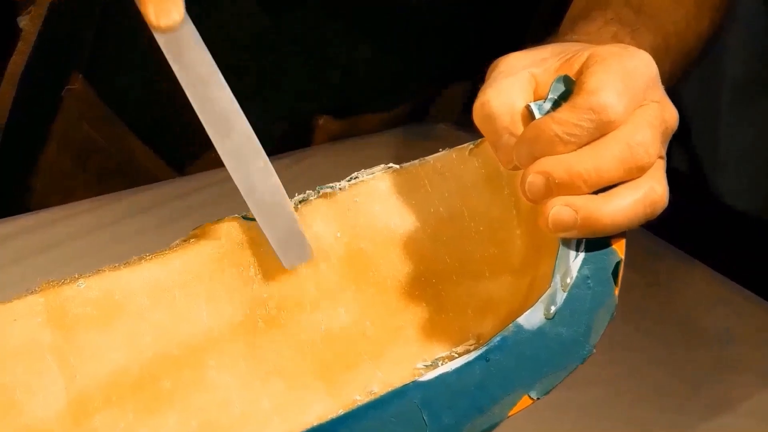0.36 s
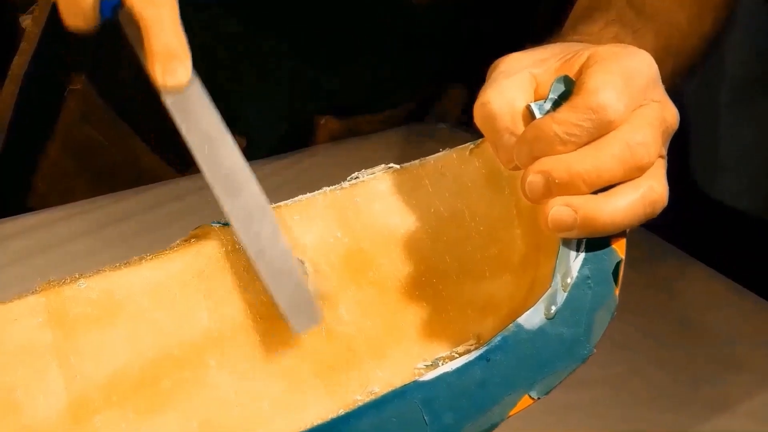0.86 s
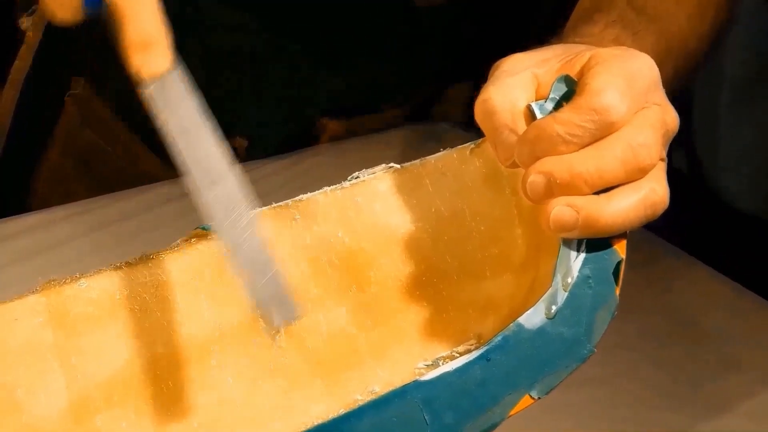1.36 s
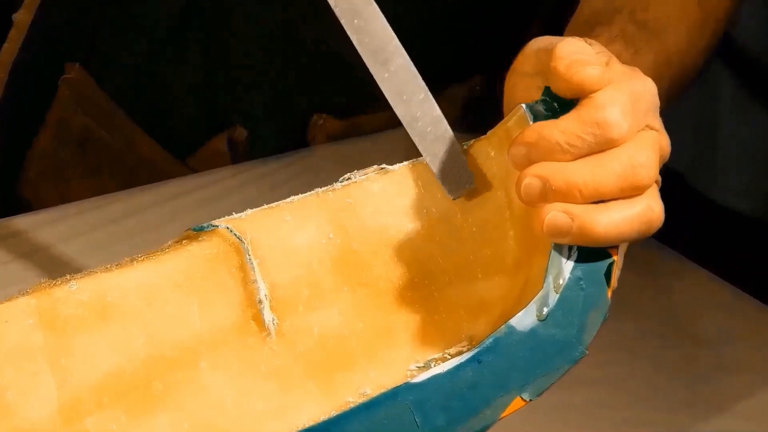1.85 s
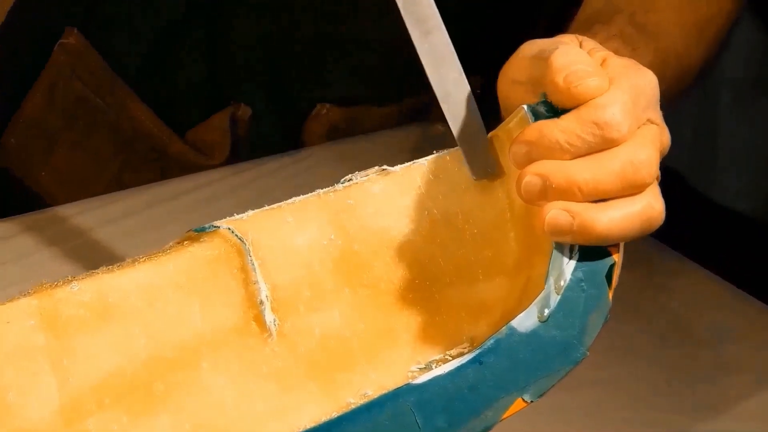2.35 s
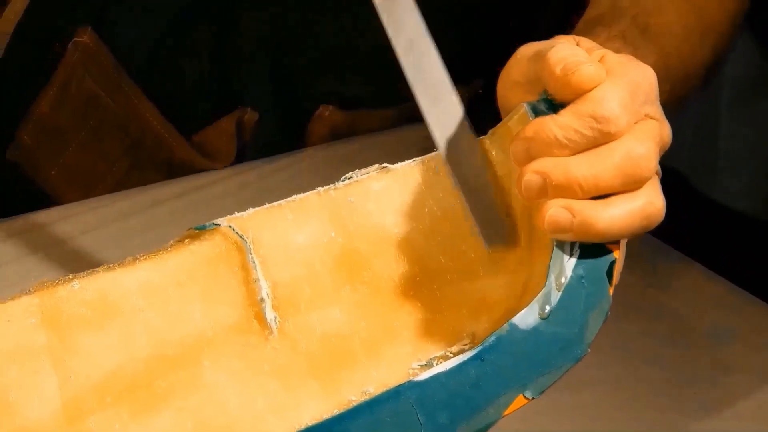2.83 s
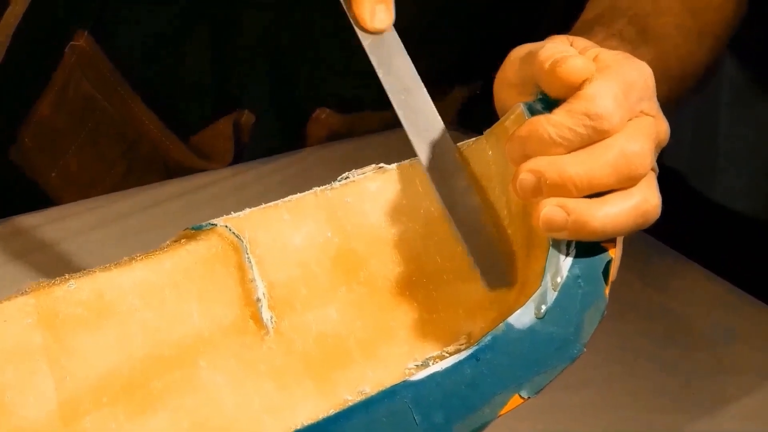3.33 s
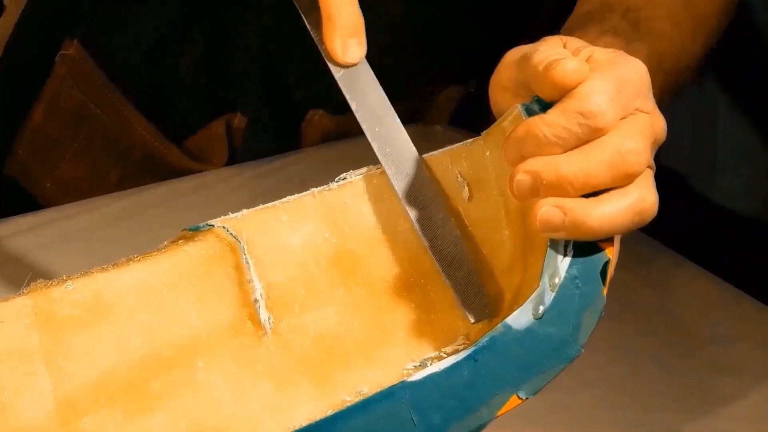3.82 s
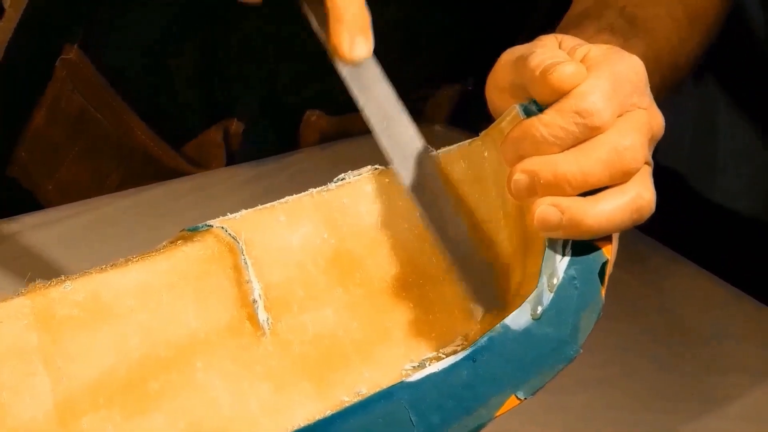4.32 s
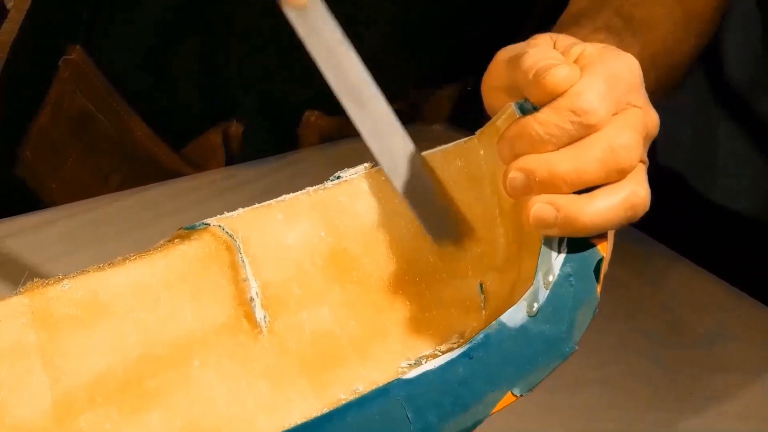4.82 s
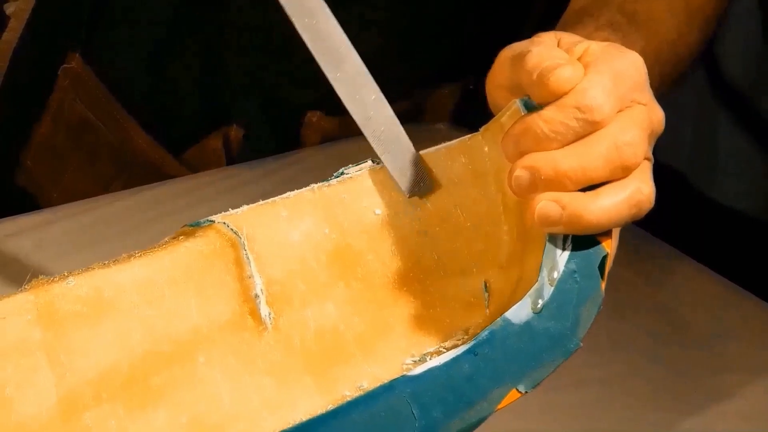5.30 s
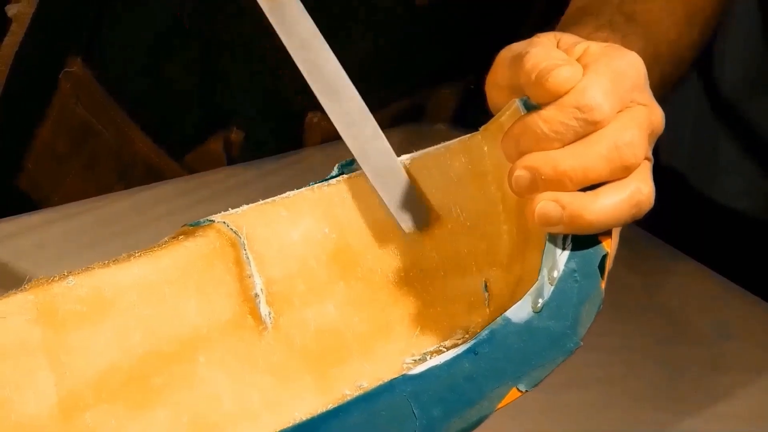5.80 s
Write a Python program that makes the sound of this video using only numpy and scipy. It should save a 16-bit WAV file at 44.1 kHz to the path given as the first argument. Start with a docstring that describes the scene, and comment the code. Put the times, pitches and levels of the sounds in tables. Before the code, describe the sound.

Close and centred in a small workshop, a steel file saws a hollow fiberglass rim. Strong pushes chatter and honk through the shell with gritty rasp and bright fibre hiss; lighter, duller strokes draw back. After three pushes it stops, with only faint taps and ticks over quiet room tone, then short scrapes lead into regular back-and-forth filing until the end.

```python
"""A flat steel file is pushed and drawn along the rim of a hollow fiberglass shell in a small workshop.
Close and centred, the teeth chatter on the rim and drive the shell's resonances; filtered random grains make
the rasp of grit in the steel and the bright hiss of tearing fibres. Clicks knock the shell and start snaps.
In a pause the file is lifted, set down on another spot and nudged into place.
Bench scatter and a room tail spread to both sides of the stereo pair, over a quiet room tone."""
import sys
import numpy as np
from scipy import signal
from scipy.fft import rfft, irfft, next_fast_len
from scipy.io import wavfile
from scipy.ndimage import uniform_filter1d

SR = 44100
rng = np.random.default_rng(int(sys.argv[2]) if len(sys.argv) > 2 else 0)


def ratio(d):
    """dB to gain"""
    e = np.asarray(d, float) / 20
    return 10 ** e


def output_pcm(signal):
    """Save a mono or channel-first signal as 16-bit PCM at the path in sys.argv[1].

    Samples are clipped to [-1, 1] before scaling.
    """
    pcm = np.clip(np.atleast_2d(signal).T, -1, 1) * 32767
    wavfile.write(sys.argv[1], SR, np.round(pcm).astype(np.int16))


N = 271985   # length in samples


def rms_one(x):
    """Scale to unit rms."""
    return x / np.sqrt(np.mean(x ** 2) + 1e-20)


def evened(x, seconds):
    """Divide out the running level."""
    return x / np.sqrt(uniform_filter1d(x ** 2, max(int(seconds * SR), 9)) + 1e-12)


def drift(rate_hz):
    """Slow chance of spread 1: noise twice through a one-pole."""
    r = np.exp(-2 * np.pi * rate_hz / SR)
    noise = rng.standard_normal(N + SR)
    return rms_one(signal.lfilter([1], [1, -2 * r, r * r], noise)[SR:])   # the first second settles the filter


def coloured(x, spectrum):
    """Weight x by a spectrum in dB, interpolated over log frequency."""
    hz, level_db = np.transpose(spectrum)
    size = next_fast_len(N)
    grid_hz = np.maximum(np.arange(size // 2 + 1) * SR / size, 1)
    gain = ratio(np.interp(np.log(grid_hz), np.log(hz), level_db))
    return irfft(rfft(x, size) * gain, size)[..., :N]


SING_DB, SING_OCTAVES = 4.5, .18      # modes this close to the chatter rate are driven harder


def resonate(force, modes, wander_db, wander_rate, chatter_hz=None):
    """Parallel resonances; each one's coupling wanders as the contact slides, and grows near the chatter rate."""
    out = np.zeros(N)
    for k, (hz, width_hz, level_db) in enumerate(modes):
        r = np.exp(-np.pi * width_hz / SR)
        near_db = 0
        if chatter_hz is not None:
            near_db = SING_DB * np.exp(-(np.log2(hz / chatter_hz) / SING_OCTAVES) ** 2)
        coupling_db = level_db + near_db + wander_db * np.clip(drift(wander_rate), -2, 1)
        drive = force * ratio(coupling_db) * (-1) ** k / np.sqrt(width_hz)
        poles = [1, -2 * r * np.cos(2 * np.pi * hz / SR), r * r]
        out += signal.lfilter([1 - r * r, 0, r * r - 1], poles, drive)
    return out


def grains(per_s, spread_db):
    """Random clicks of uneven size and sign."""
    sizes = ratio(spread_db * np.minimum(rng.exponential(1, N), 5)) * rng.choice([-1, 1], N)
    return rms_one(sizes * (rng.random(N) < per_s / SR))


def clicks(events):
    """A train of clicks at the events' moments."""
    train = np.full(N, 1e-18)
    for s, level_db in events:
        train[int(s * SR)] = ratio(level_db)
    return train


LANDING_DB = -30                          # level one bite time ahead of the stroke; twice as low two ahead
KNEE_SHARE, KNEE_LEFT = 0.406, 0.2487     # this far to the crest, this share of the swell is left


def stroke_db(t, strokes, shape):
    """One row a stroke: the file lands and bites, swells fast then slowly, glides to the end level, lets go."""
    bite_s, bite_db, delay, end_db, release = shape
    levels = [2 * LANDING_DB, LANDING_DB, bite_db, KNEE_LEFT * bite_db, 0, end_db, end_db - 2 * release]
    rows = []
    for s, length, crest, *_ in strokes:
        top = np.clip(crest + delay, .03, .97) * length
        times = [-2 * bite_s, -bite_s, 0, KNEE_SHARE * top, top, length, length + 2]
        rows.append(np.interp(t - s, times, levels, left=-200))
    return np.array(rows)


def swell_db(t, events, slopes):
    """One row an event: straight rise in dB, hold, straight fall."""
    s, level_db, hold = np.array(events).T[:3, :, None]
    rise, fall = slopes[0] * (t - s), slopes[1] * (s + hold - t)
    return level_db + np.minimum(0, np.minimum(rise, fall))


LET_GO_S = .06


def glide(t, strokes, span_hz):
    """Chatter rate along each stroke and just after it."""
    return np.array([np.interp(t - s, [0, length, length + LET_GO_S], span_hz) for s, length, *_ in strokes])


def summed(*rows_db):
    """Levels add as powers."""
    return 10 * np.log10(np.sum(ratio(np.vstack(rows_db)) ** 2, axis=0) + 1e-14)


# cutting strokes, pushed away:
# start t/s, length t/s, crest [share of length], shell level/dB, rasp level/dB, fibre hiss level/dB
PUSHES = [(0.055, .18, 0.4604, -19, -25.5, -32.5), (0.620, .19, 0.453, -18.5, -27, -32),
          (1.172, .12, 0.701, -21, -31, -32), (2.466, 0.04045, 0.9, -26, -35.5, -31),
          (2.585, 0.0925, 0.43, -22, -33, -39), (2.688, 0.14, 0.787, -21, -28, -29.5),
          (3.215, .18, 0.454, -21, -27, -32.5), (3.758, 0.19, 0.26, -19, -25.5, -29),
          (4.298, .21, 0.34, -20.5, -28, -30.5), (4.897, .235, 0.2983, -20.5, -26, -29.5),
          (5.488, 0.17, 0.18, -22.5, -28.5, -29), (6.129, 0.13, .15, -22.5, -21, -27)]
# light strokes, drawn back:
# start t/s, length t/s, crest [share of length], shell level/dB, rasp level/dB, fibre hiss level/dB
DRAWS = [(-0.12, 0.12, .3, -27, -30.5, -43), (0.408, 0.16, 0.058, -28, -36, -51),
         (1.011, 0.11, 0.21, -24, -37, -51.5), (2.925, .2, 0.38, -23.5, -38.5, -47),
         (3.495, 0.17, 0.1, -23, -37.5, -47), (4.026, .19, 0.15, -27, -36, -48),
         (4.588, .23, 0.3, -23, -31, -43), (5.233, 0.18, 0.31, -28.5, -33.5, -43.5),
         (5.835, .14, .7, -27, -31.5, -47)]
# the teeth grab and one mode of the shell sings out: t/s, level/dB, hold t/s, chatter f/Hz
GRABS = [(0.121, -11, 0.01484, 826.4), (.185, -16, 0.0456, 390), (0.419, -17, 0.01999, 813.8),
         (0.526, -20, 0.01504, 805), (0.546, -25, .035, 387.7), (0.657, -20, 0.01957, 867.4),
         (.720, -17.5, 0.0302, 476), (0.747, -14.5, .02, 823), (1.02, -19.5, .03, 827),
         (1.074, -23, 0.04986, 392.4), (1.222, -18.5, 0.0248, 842), (1.269, -13.5, .02, 538),
         (1.299, -19.5, 0.01493, 537), (2.709, -22, .015, 771), (2.773, -18.5, .05, 890.5),
         (2.943, -23, 0.0303, 373), (3.029, -21, 0.03956, 547.8), (3.319, -13.5, 0.0297, 788),
         (3.355, -17.5, .03, 1001), (3.500, -23, 0.017, 549), (3.554, -18, 0.0199, 380),
         (3.604, -20, 0.0304, 561.3), (3.669, -27, 0.02986, 350.3), (3.798, -16, 0.046, 842.5),
         (3.857, -16, 0.04076, 441.5), (4.031, -24, 0.03006, 338), (4.140, -27, .03, 980.3),
         (4.368, -16, .04, 897), (4.454, -18, .05, 560), (4.592, -25, 0.0199, 320), (4.665, -21, .02, 689),
         (4.701, -22, 0.0603, 425), (4.791, -24.5, .03, 390.2), (4.943, -14, .015, 910),
         (4.976, -15, .025, 958), (5.048, -19, 0.0306, 366), (5.345, -19, .04, 387.7),
         (5.506, -21, 0.01965, 544), (5.561, -16.5, .015, 439), (5.602, -22.5, .02, 430),
         (5.670, -25, 0.027, 324), (5.900, -22, .03, 750), (5.937, -20, 0.011, 358), (6.161, -18, .03, 797)]
# the whole shell lurches on the bench: t/s, level/dB, hold t/s
LURCHES = [(0.203, -26, 0.018), (0.241, -22.5, .04), (0.537, -33, 0.051), (.816, -23, .02),
           (1.064, -38, 0.021), (1.182, -26.5, 0.019), (1.288, -35, 0.037), (2.506, -32.5, 0.019),
           (2.625, -21.5, .06), (2.812, -28, 0.021), (2.932, -27, .02), (3.235, -31, 0.021),
           (3.385, -24, 0.046), (3.505, -30, .02), (3.768, -30, 0.016), (3.919, -19, 0.06),
           (4.052, -25.5, 0.047), (4.309, -32, .03), (4.488, -19, .025), (4.590, -28, .02),
           (5.027, -24, .05), (5.103, -21, 0.044), (5.509, -25, .02), (5.661, -22.5, 0.034),
           (6.131, -27.5, 0.018)]
# a bundle of fibres rips: t/s, level/dB, hold t/s
RIPS = [(.120, -29.5, 0.011), (2.488, -25.5, 0.0096), (2.61, -31, 0.011), (2.696, -27.5, 0.011),
        (2.773, -25.5, 0.023), (2.967, -33, 0.0095), (3.815, -23, 0.025), (4.376, -28.5, 0.0095),
        (5.078, -31, 0.0093), (5.268, -37, .01), (5.533, -22, 0.021), (5.825, -35.5, .01),
        (5.950, -35, .01)]
# the file is lifted, set down and nudged: t/s, shell level/dB, deep boom level/dB, fibre hiss level/dB
NUDGE = [(1.3, -37.5, -29, -79), (1.559, -70, -77, -84.5), (1.66, -67, -48, -69), (1.74, -80, -74, -89),
         (1.974, -85, -79, -88), (2.0, -52, -36.5, -78), (2.069, -62.5, -48, -90), (2.27, -54.5, -44, -55),
         (2.34, -52, -40.5, -58), (2.43, -58.5, -61, -71), (2.5, -95, -90, -84.5)]
NUDGE_CHATTER_HZ, NUDGE_RASP_DB = 380, -25      # rasp against the shell
# how a stroke shapes each layer:
# bite t/s, level/dB at the bite, delay of the crest [share of length], level/dB at the end, release [dB/s]
PUSH_SHELL, PUSH_BOOM = (0.29, -16.5, 0.4, -6, 260), (.03, 2.5, -1.8, 1.5, 168.5)
PUSH_RASP, PUSH_HISS = (0.01, -18.5, -0.36, -2, 324), (0.03, -19, -0.03, -3.5, 481.5)
DRAW_SHELL, DRAW_BOOM = (0.014, -6.5, 0.9, -3, 260.5), (0.2, -4, -2.2, -1, 199)
DRAW_RASP, DRAW_HISS = (0.08, -8.5, 0.16, -9, 249), (0.08, -0.5, 0.5, -10, 200.5)
PUSH_BOOM_DB, DRAW_BOOM_DB = -37.5, -33.5
# swell and fade: rise [dB/s], fall [dB/s]
GRAB_SLOPES, LURCH_SLOPES, RIP_SLOPES = (800, 800), (500, 320), (900, 500)
# the chatter slows along a stroke: f/Hz at the start, f/Hz at the end, f/Hz once let go
PUSH_CHATTER, DRAW_CHATTER = (820, 480, 340), (640, 430, 340)
THIN_DB_PER_OCTAVE, THIN_FULL_HZ = 7.5, 931     # faster chatter favours the thin upper modes
DULL_DB, DULL_PER_HISS_DB = -3, -0.18           # the more fibres tear against the grit, the brighter the rasp
STEP_S = .002                                   # time step of the levels


def controls():
    """Levels and chatter rate from strokes, grabs, lurches, rips and nudges."""
    t = np.arange(0, N / SR + STEP_S, STEP_S)
    push, draw = np.array(PUSHES), np.array(DRAWS)
    s, *columns = np.transpose(NUDGE)
    nudge, nudge_boom, nudge_hiss = [np.interp(t, s, c, left=-200) for c in columns]
    shells = np.vstack([push[:, 3:4] + stroke_db(t, push, PUSH_SHELL),
                        draw[:, 3:4] + stroke_db(t, draw, DRAW_SHELL),
                        swell_db(t, GRABS, GRAB_SLOPES), nudge])
    rates = np.vstack([glide(t, push, PUSH_CHATTER), glide(t, draw, DRAW_CHATTER),
                       np.array(GRABS)[:, 3:] + 0 * t, NUDGE_CHATTER_HZ + 0 * t])
    # the loudest contact sets the chatter rate
    chatter = np.average(rates, axis=0, weights=ratio(shells) ** 2 + 1e-18)
    boom = summed(PUSH_BOOM_DB + stroke_db(t, push, PUSH_BOOM), DRAW_BOOM_DB + stroke_db(t, draw, DRAW_BOOM),
                  swell_db(t, LURCHES, LURCH_SLOPES), nudge_boom)
    grit = summed(push[:, 4:5] + stroke_db(t, push, PUSH_RASP), draw[:, 4:5] + stroke_db(t, draw, DRAW_RASP),
                  nudge + NUDGE_RASP_DB)
    hiss = summed(push[:, 5:] + stroke_db(t, push, PUSH_HISS), draw[:, 5:] + stroke_db(t, draw, DRAW_HISS),
                  swell_db(t, RIPS, RIP_SLOPES), nudge_hiss)
    thin = THIN_DB_PER_OCTAVE * np.log2(chatter / THIN_FULL_HZ)
    dull = DULL_DB + DULL_PER_HISS_DB * (hiss - grit)
    curves = (summed(shells), chatter, boom, thin, grit, dull, hiss)
    return [np.interp(np.arange(N) / SR, t, c) for c in curves]


# shell modes, the first nine full, the rest thin (knocks ring them too): f/Hz, width f/Hz, relative level/dB
SHELL_MODES = [(270, 43, -3.5), (313, 30, -2), (354, 14, 0), (385.4, 11, 3), (446.2, 14, -4.5),
               (475, 19, -8.5), (549, 30, 2.5), (614.7, 64, -3.5), (658, 6.2, -8.5), (696, 14, -6),
               (744.6, 21, -2.5), (814.6, 42, 3), (882.5, 59, -0.5), (964, 11, 1), (981.4, 20, -7.5),
               (1075.6, 22, -6), (1192, 70, -18.5), (1430, 23, -20), (1486.5, 12, -13)]
# deep modes of the whole shell on the bench: f/Hz, width f/Hz, relative level/dB
BOOM_MODES = [(45.9, 330, -21.5), (116.7, 21, -8.5), (158.6, 17, -2.5), (211.8, 34, -1)]


def shell(level_db, chatter_hz, boom_db, thin_db):
    """Teeth catch and slip unevenly at the chatter rate; nearby modes sing out of the grind.
    Near the free rim the thin upper modes take a larger share."""
    phase = 2 * np.pi * np.cumsum(chatter_hz * (1 + 0.0502 * drift(39.4))) / SR
    chatter = rms_one(np.sin(phase) * ratio(9.8 * drift(44)))
    force = grains(2500, 3.45) + 0.08 * chatter
    # the resin edge is a soft contact
    force = signal.sosfilt(signal.butter(2, 1300, fs=SR, output="sos"), force)
    full, thin = [evened(resonate(force, modes, wander_db=4.0, wander_rate=9.0, chatter_hz=chatter_hz), 0.045)
                  for modes in (SHELL_MODES[:9], SHELL_MODES[9:])]
    deep = evened(resonate(force, BOOM_MODES, wander_db=3.0, wander_rate=7.1), 0.17)
    share = np.clip(ratio(thin_db), .05, .97)
    ring = np.sqrt(1 - share ** 2) * full + share * thin
    return ratio(level_db) * ring + ratio(boom_db) * deep


# bending modes of the steel file: f/Hz, width f/Hz, relative level/dB
STEEL_MODES = [(1805, 58, -1.5), (1955, 19, 0), (2106, 55.6, 4.5), (2304, 31, -8.5), (2424, 48, -10),
               (2754, 36, 5.5), (3090, 110, -4), (3434, 12, 3), (4510, 270, -10), (5700, 67, -8)]
# spectrum of the grit (it also tints the snaps): f/Hz, relative level/dB
RASP_SPECTRUM = [(650, -12.5), (1100, -5), (1880, -18.5), (2090, -18.5), (2340, -16), (2650, -10.5),
                 (2870, -16.5), (3450, -14), (9000, -28.5), (11700, -64), (19800, -120)]


def rasp(level_db, dull_db):
    """Grit under the teeth, partly ringing the steel; its dull and bright parts trade shares."""
    grit = grains(5000, 1.1) * ratio(2.3 * drift(30))
    steel = rms_one(resonate(grit, STEEL_MODES, wander_db=5.0, wander_rate=11.0))
    mix = rms_one(coloured(grit, RASP_SPECTRUM)) + 0.55 * steel
    dull = signal.sosfilt(signal.butter(2, 2500, fs=SR, output="sos"), mix)
    bright = mix - dull
    share = np.clip(ratio(dull_db), .05, .97)
    return ratio(level_db) * (share * rms_one(dull) + np.sqrt(1 - share ** 2) * rms_one(bright))


# high modes of the steel file: f/Hz, width f/Hz, relative level/dB
STEEL_HIGH_MODES = [(10960, 440, 13), (11300, 200, -3.5), (12250, 630, 9), (12800, 130, -7.5),
                    (13360, 150, -4.5), (15580, 270, 2)]
# spectrum of tearing fibres: f/Hz, relative level/dB
HISS_SPECTRUM = [(4400, -16.5), (7500, -20.5), (9500, -10.5), (10250, -8.5), (10500, -1.5), (13000, -2.5),
                 (15800, -2.5)]
# fibres snapping under a tooth: t/s, relative level/dB
SNAPS = [(0.0613, -27), (0.3386, -25), (0.4123, -14.5), (0.6255, -20.5), (1.6411, -48), (2.239, -34),
         (2.2638, -27), (2.334, -19.5), (2.4379, -22.5), (2.597, -16), (2.6926, -12), (3.7592, -54),
         (4.2223, -22), (4.5993, -11.5), (5.2654, -10.5), (5.502, -9), (5.7254, -16.5), (5.9354, -17),
         (6.1295, -24)]


def fibres(level_db):
    """Glass fibres tear in a dense bright hiss; single ones snap in short bursts."""
    tear = grains(9000, 3.6) * ratio(1.2 * drift(39))
    steel = rms_one(resonate(tear, STEEL_HIGH_MODES, wander_db=6.0, wander_rate=8.0))
    hiss = rms_one(rms_one(coloured(tear, HISS_SPECTRUM)) + 0.61 * steel)
    fade = np.exp(-1 / (0.004 * SR))   # 4 ms decay
    bursts = signal.lfilter([1], [1, -fade], clicks(SNAPS))
    bright = coloured(rng.standard_normal(N), HISS_SPECTRUM)
    crack = rms_one(bright + 0.2 * coloured(rng.standard_normal(N), RASP_SPECTRUM))
    return ratio(level_db) * hiss + ratio(-10.5) * bursts * crack


# how much the echoes differ between the sides: f/Hz, level/dB side over mid
SPREAD = [(30, -1), (125, -21), (400, -19), (700, -12), (1200, -0.5), (3000, 1), (8000, -6.5), (16000, 4.5)]
ROOM_T60_S, ROOM_DB, BENCH_T60_S, BENCH_DB = 0.43, -9.5, 0.049, -7


def workshop(x):
    """A dying room tail, and scatter off the bench that reaches the two sides in opposite phase."""
    t = np.arange(N) / SR
    mid = rng.standard_normal(N)
    side = coloured(rng.standard_normal(N), SPREAD) * [[1], [-1]]

    def fade(t60):
        """Exponential decay of unit energy."""
        return ratio(-60 * t / t60) * np.sqrt(6 * np.log(10) / (t60 * SR))

    bench = ratio(BENCH_DB) * side * fade(BENCH_T60_S)
    room = ratio(ROOM_DB) * (mid + side) * fade(ROOM_T60_S)
    return signal.fftconvolve(x[None], (bench + room)[:, :SR // 2], axes=1)[:, :N]


# spectrum of the room tone: f/Hz, relative level/dB
AIR_SPECTRUM = [(20, -6), (90, 2.5), (130, 5), (200, -12), (400, -4), (900, -23), (1800, -24.5),
                (4000, -30.5), (8000, -32.5), (11000, -35), (16000, -31.5)]
AIR_DB = -62.5


def air():
    """The quiet room tone: steady noise, partly different on the two sides."""
    mid, side = rng.standard_normal((2, N))
    return ratio(AIR_DB) * rms_one(coloured(mid + .45 * side * [[1], [-1]], AIR_SPECTRUM))


# the file knocks on the rim: t/s, relative level/dB
KNOCKS = [(0.123, -40), (0.418, -36), (1.017, -21), (1.643, -32.5), (1.698, -40), (1.894, -53),
          (1.988, -37), (2.091, -41), (2.142, -42), (2.216, -28), (2.267, -25.5), (2.335, -26),
          (2.436, -41), (3.322, -17), (4.363, -8), (4.941, -16)]


def knocks():
    """A soft blow rings every mode of the shell."""
    blow = signal.lfilter([.05], [1, -.95], clicks(KNOCKS))
    ring = resonate(blow, SHELL_MODES, wander_db=5.5, wander_rate=7.5)
    deep = resonate(blow, BOOM_MODES, wander_db=1.0, wander_rate=27)
    return ratio(42.5) * (ring + ratio(4.5) * deep)


def scene():
    """File on shell, close and centred, in the room."""
    shell_db, chatter_hz, boom_db, thin_db, rasp_db, dull_db, hiss_db = controls()
    work = shell(shell_db, chatter_hz, boom_db, thin_db) + rasp(rasp_db, dull_db) + fibres(hiss_db) + knocks()
    return work + workshop(work) + air()


def roll_off(x):
    """The treble ends steeply here."""
    return signal.sosfilt(signal.butter(12, 16720, fs=SR, output="sos"), x)


def record(dry):
    """The top is cut steeply at 15.8 kHz."""
    cut = signal.ellip(12, .5, 80, 15800, fs=SR, output="sos")
    mix = signal.sosfilt(cut, dry)
    return roll_off(mix)


dry = scene()
out = record(dry)
output_pcm(out)
```